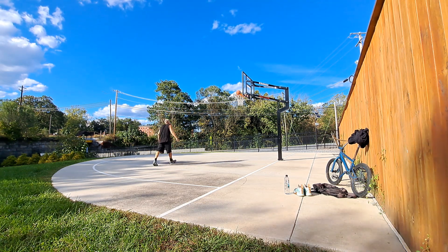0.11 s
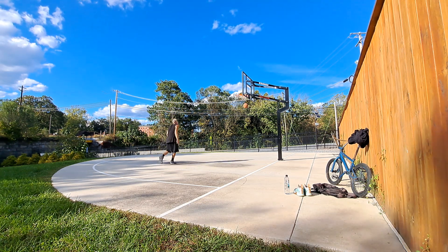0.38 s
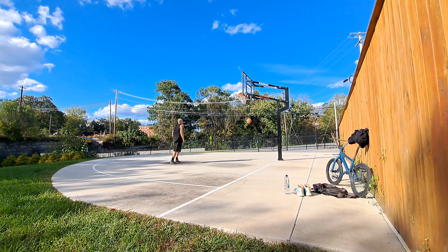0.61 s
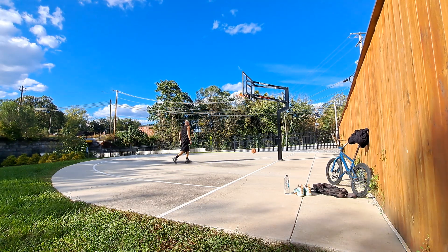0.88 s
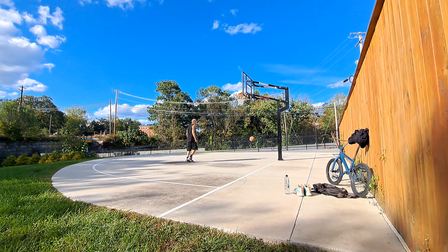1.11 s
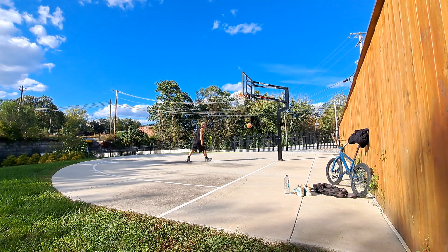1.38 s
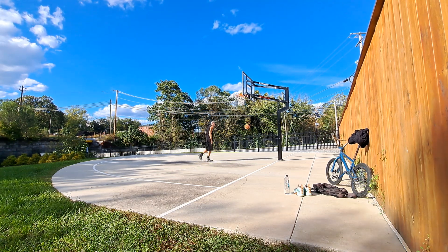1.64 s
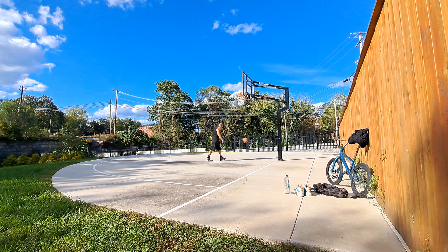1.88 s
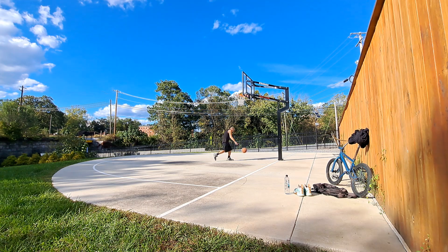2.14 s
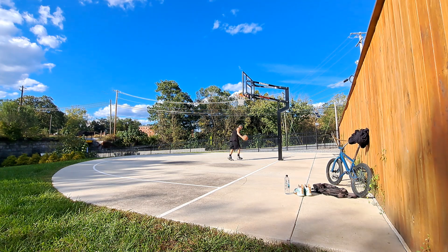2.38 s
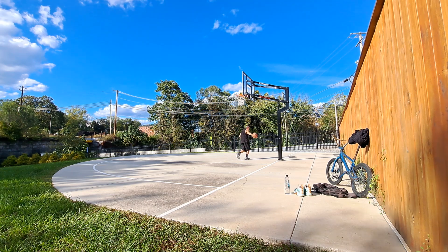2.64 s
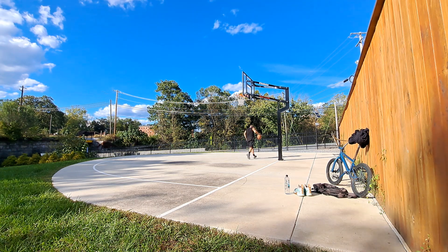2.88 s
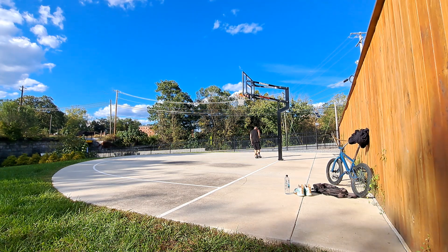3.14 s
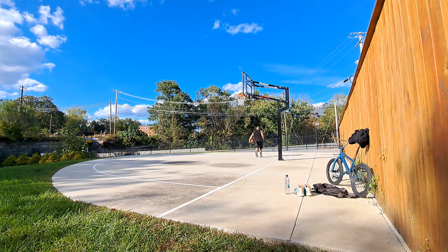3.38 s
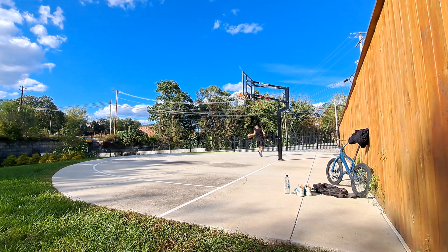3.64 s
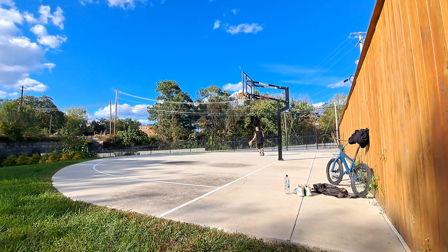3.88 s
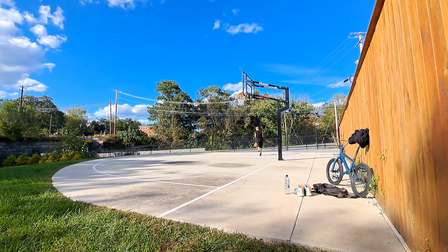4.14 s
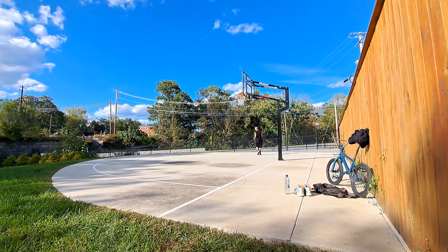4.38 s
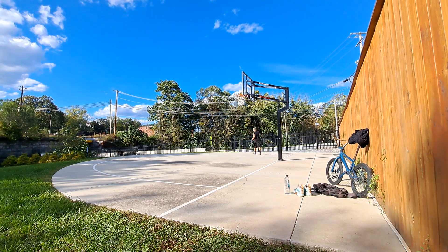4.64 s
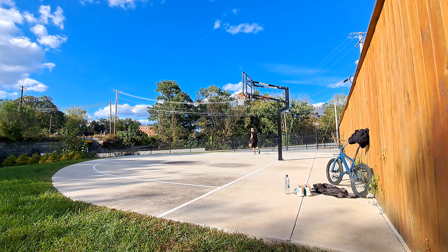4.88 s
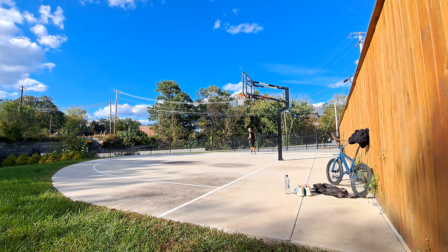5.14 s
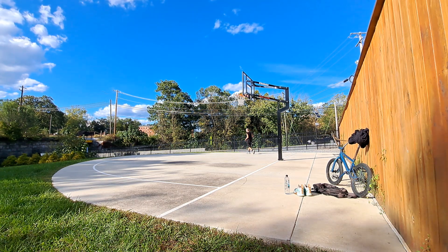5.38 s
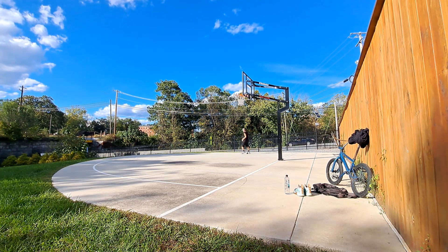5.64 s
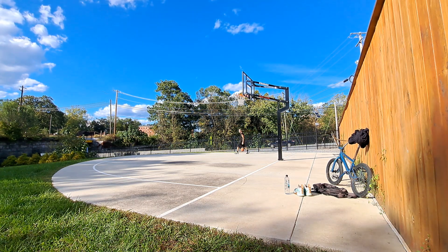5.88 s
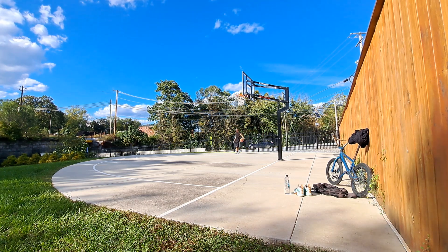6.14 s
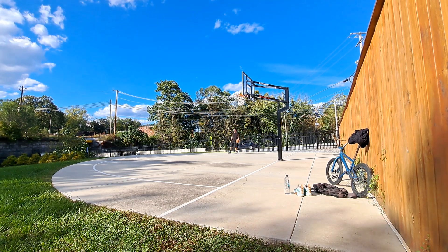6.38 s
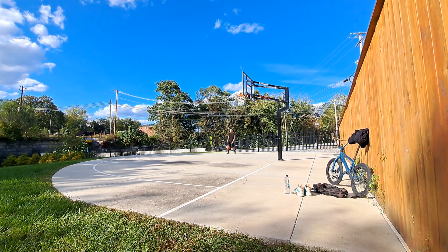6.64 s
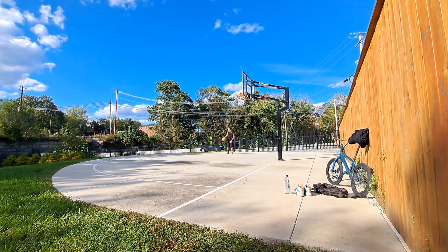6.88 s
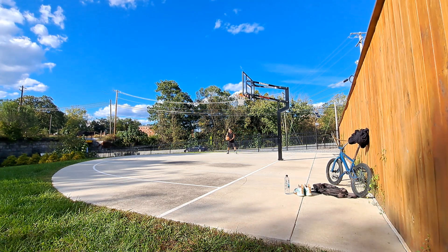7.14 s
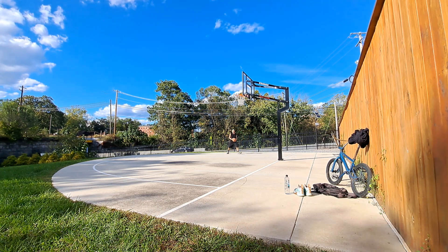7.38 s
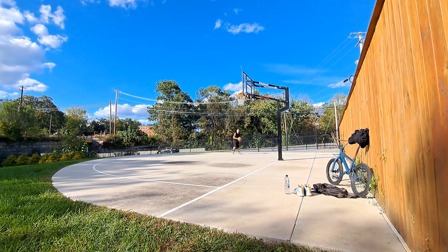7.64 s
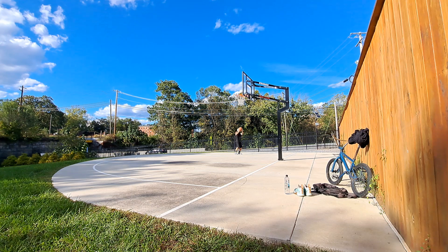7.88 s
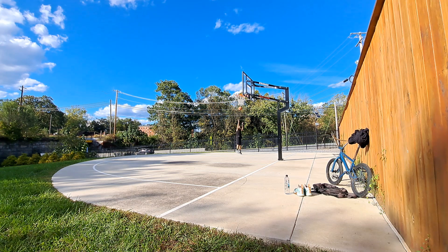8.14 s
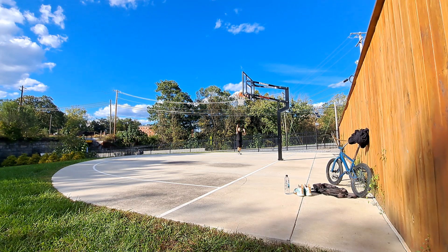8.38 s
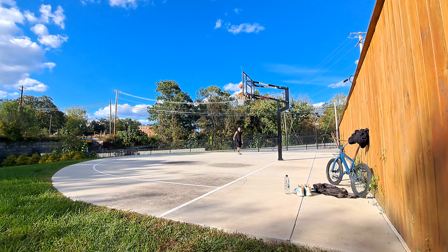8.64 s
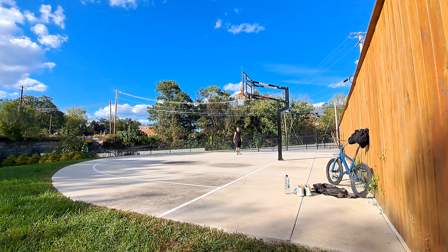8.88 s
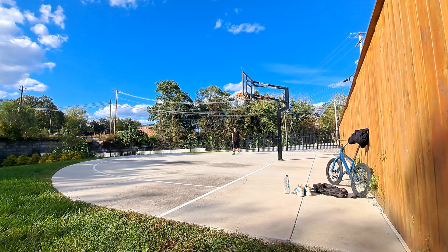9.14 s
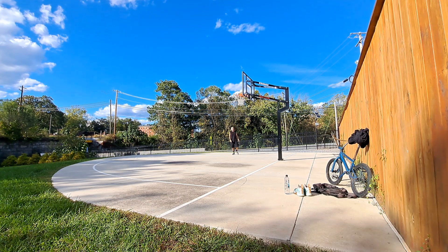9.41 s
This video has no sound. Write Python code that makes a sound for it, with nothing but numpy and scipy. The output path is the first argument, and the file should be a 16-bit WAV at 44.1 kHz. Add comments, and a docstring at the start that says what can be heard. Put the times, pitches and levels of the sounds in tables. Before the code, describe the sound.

Single sharp basketball bounces on outdoor concrete, about one a second, with hollow ring and soft echoes over crickets, low road hum and scuffing shoes.

```python
"""Outdoor court beside a wooden wall, heard by a phone: road noise, distant cars, a lorry drawing away and
crickets from the start, while a low hum slowly rises; shoes scuff and an insect buzzes as shaped noise.
Then a basketball bounces on concrete: slap, ringing air, thump, echoes; the first bounce rings the hoop post.
Later a small bird chips, thin whistles hold, soles squeak and a katydid rasps, all as gliding tones.
Cars pass nearer late on; near the end an engine revs."""
import sys
import numpy as np
from scipy import signal
from scipy.fft import rfft, irfft, next_fast_len
from scipy.io import wavfile
from scipy.ndimage import uniform_filter1d

SR = 44100
rng = np.random.default_rng(int(sys.argv[2]) if len(sys.argv) > 2 else 0)


def volts_from_db(level):
    """Convert decibel levels to linear amplitude ratios."""
    exponent = np.asarray(level, float) / 20
    return 10 ** exponent


def unload_wav(signal):
    """Save mono or channel-first audio to the path in sys.argv[1] as 16-bit WAV at rate SR, clipped to [-1, 1]."""
    wavfile.write(
        sys.argv[1],
        SR,
        np.round(np.clip(np.atleast_2d(signal).T, -1, 1) * 32767).astype(np.int16),
    )


N = 419832
T = np.arange(N) / SR

# diffuse air noise: freq_hz, relative_density_db
AIR_COLOUR = [(18, -44), (30, -10), (124, -7), (271, -16), (326, -17.5), (509, -22), (581, -23.5),
              (1490, -30), (2150, -32.5), (2870, -42.5), (3300, -42.5), (4000, -37), (4730, -39.5),
              (6200, -43.5), (7390, -42), (9350, -53.5), (12500, -53), (15800, -59)]
AIR_DB, AIR_BAND_HZ = -46.5, (32, 20000)  # low_hz, high_hz
# tyre and drone noise: freq_hz, relative_density_db
TYRE_COLOUR = [(150, -43), (250, -2.5), (335, -5.5), (850, -1), (2040, -10), (2810, -19.5), (4030, 9),
               (4300, -15), (6000, -22.5), (7800, -63), (13200, -120)]
# likeness of left and right diffuse noise: freq_hz, correlation
PORT_LIKENESS = [(60, 0.96), (130, 0.86), (290, 0.69), (640, 0.29), (1410, -0.28), (3100, 0.43),
                 (6820, -0.18), (15000, -0.066)]
# phone body shades the ports: freq_hz, left_minus_right_db
PORT_LEAN = [(60, .5), (250, -1), (500, 1), (1300, -1), (2400, -2.5), (4400, -6), (7500, -8), (9500, -1),
             (15000, -3)]
# cars: closest_s, time_to_41_percent_farther_s, drone_db, tyre_hiss_db
CARS = [(.7, 0.43, -55.5, -65.5), (5.6, 0.29, -45, -58.5), (6.9, 1, -47, -58), (8.2, 1, -44.5, -51)]
SCREEN_DB = 29.5  # fall per tenfold distance, hedges included
RUMBLE_DB, THRUM_DB, SWELL_DB = -47.5, -49.5, 3
TYRE_BOOM_DB = 1  # rumble added by near cars, relative to tyre hiss
# lorry firing tone: time_s, level_db
LORRY_LEVEL = [(0, -47.5), (.35, -43), (.55, -35), (1.0, -32), (1.5, -46.5), (1.9, -39.5), (2.4, -50.5),
               (3.2, -45), (4.4, -59)]
LORRY_HZ, LORRY_SINK_HZ_PER_S = 125.6, 5.6
# low hum that fades in and grows: time_s, peak_db
HUM_LEVEL = [(0, -92), (2.4, -50.5), (7, -45), (9.52, -40.5)]
HUM_HZ = 119

# steady cricket bouts: first_chirp_s, chirp_count, period_s
STEADY_BOUTS = [(-.037, 12, .2545), (3.24, 5, .258), (5.79, 10, .2585)]
# near cricket: start_s
NEAR_CHIRPS = [0.373, 0.855, 1.425, 2.052, 2.58, 3.04, 3.530, 4.078, 4.58, 5.101, 5.604, 6.108, 6.62, 7.091,
               7.688, 8.213, 8.703, 9.232]
# far cricket: start_s
FAR_CHIRPS = [.65, 1.48, 1.81, 2.322, 2.812, 3.31, 3.74, 4.728, 6.518, 9.39]
LEFT_LAG_SAMPLES = 4

# shoes on concrete, before SHOES_DB: start_s, hiss_db, top_hiss_db, length_s, low_scrape_db
SCUFFS = [(0.239, -52, -60, 0.024, -55), (0.307, -57, -66, 0.025, -47), (0.328, -51, -66, 0.028, -62),
          (0.346, -56, -54, 0.018, -40.5), (0.892, -57, -61, 0.037, -57), (2.11, -60, -65, 0.021, -68),
          (2.413, -58, -69, 0.018, -60), (2.646, -57, -67, 0.014, -53), (2.898, -76, -60, 0.028, -59),
          (3.023, -46.5, -41, 0.044, -55), (3.458, -47.5, -54, 0.014, -54.5), (3.844, -49, -50, 0.024, -59),
          (4.233, -60, -56.5, 0.069, -57), (4.681, -61, -49, 0.01, -66), (4.708, -73, -57, 0.086, -74),
          (5.882, -52.5, -66, 0.08, -62), (6.829, -53, -68, 0.096, -50.5), (7.812, -47, -51, 0.025, -47),
          (7.836, -36, -52, 0.056, -47), (8.397, -46.5, -97, 0.018, -81), (9.114, -59, -69, 0.07, -50.5),
          (9.184, -55, -49.5, 0.043, -46.5)]
# grit under a sole: freq_hz, relative_density_db
GRIT_COLOUR = [(1470, -45.5), (2500, 2), (2790, -8), (3910, 10.5), (4290, -14), (4820, 3.5), (5580, -6.5),
               (7890, -2.5), (9790, -27), (12800, -15), (15800, -15.5)]
SHOES_DB = -5.5
# direct and wall paths to left and right port: direct_samples, wall_samples
PORT_PATHS = [(4, 38), (0, 31)]
WALL_DB = 2
# buzzing insect: start_s
BUZZES = [.46, .92, 1.36, 1.85, 3.5, 3.96, 4.55, 8.64]
BUZZ_DB = -68

# bounces: start_s, thump_db, slap_above_thump_db, knock_above_thump_db, far_echo_ms
BOUNCES = [(1.0647, -6.5, -5, -6, 60), (2.193, -15, -0.5, -2.5, 62), (3.2890, -14.5, -12.5, 2.5, 57),
           (4.1597, -13, -10, 0, 46.4), (5.118, -13.5, -5.5, -2.5, 32), (5.987, -14.5, -4.5, -5, 60),
           (6.7068, -14, -4.5, -9, 64)]
# skin on slab, before tilt: freq_hz, relative_density_db
SLAP_COLOUR = [(410, -34), (700, -2), (1590, 0.5), (3670, -7), (5150, -6), (6100, -14.5), (7130, -8.5),
               (8340, -18), (9380, -29), (12300, -22.5), (15800, -36)]
BRIGHTER_DB_PER_OCTAVE_PER_DB, USUAL_THUMP_DB = 0.42, -16
# air in the ball, before RING_DB: freq_hz, level_db, t60_s
CAVITY_MODES = [(400, -10.5, 0.077), (614, -3.5, 0.042), (720, 1, 0.017), (805, 3, 0.025),
                (919, 4.5, 0.024), (1080, 1.5, 0.023), (1266, -15, 0.074), (1780, 3, 0.017),
                (2570, 0, 0.014)]
# shell squashed on the slab: freq_hz, level_db, t60_s
THUMP_MODES = [(138, 0.007, 0.046)]
# shell knock, relative to each bounce: freq_hz, level_db, t60_s
KNOCK_MODES = [(199, -7, 0.046), (262.5, 1.5, 0.0247)]
CONTACT_S, LIFT_DB = 0.012, -11.5
THUMP_LAG_S, KNOCK_LAG_S, RING_RISE_S = 0.0026, 0.003, 0.002
RING_DB, ECHO_DB = -9, -33  # relative to thump; scale the modes and echo envelope
# far echoes: freq_hz, relative_density_db
FAR_COLOUR = [(150, -5), (300, 4), (1000, -3.5), (2200, -8.5), (3200, -16.5), (5500, -20.5), (8000, -29),
              (10000, -37), (15500, -39)]
# hoop post: freq_hz, level_db, t60_s
HOOP_MODE = (2870, -41, .6)

# bird chips: start_s, length_s, from_hz, to_hz, level_db
CHIPS = [(4.365, 0.033, 8690, 8700, -65), (4.693, 0.089, 8700, 8340, -67), (4.74, 0.032, 8700, 7500, -61),
         (4.815, 0.036, 6950, 8000, -65), (4.842, 0.05, 8150, 8200, -62), (4.876, 0.053, 8100, 7500, -66),
         (4.974, 0.038, 7000, 6030, -61), (6.339, 0.05, 8560, 7600, -62), (6.425, 0.045, 6250, 7200, -62),
         (9.263, 0.061, 5940, 7000, -62)]
# held whistles, perhaps brakes: start_s, length_s, pitch_hz, level_db
WHISTLES = [(5.78, .4, 7380, -68), (6.15, .75, 7350, -72), (6.0, .5, 9020, -80), (7.33, .15, 7260, -69)]
SAG_HZ_PER_S = 72
# sole squeaks: start_s, pitch_hz, level_db
SQUEAKS = [(6.875, 4730, -59), (7.817, 4930, -52), (7.87, 4900, -45)]
SQUEAK_S, SQUEAK_END_RATIO = 0.022, 0.92
RASP_S, RASP_PERIOD_S, RASP_TOP_S = 7.012, 0.271, 7.65
RASP_REFERENCE_DB, RASP_FADE_DB_PER_S = -54.5, 6
REV_S, REV_HZ, REV_RISE_HZ_PER_S, REV_DB = 9.1, 121.7, 35.7, -36.5
REV_ATTACK_S, REV_HOLD_S, REV_RELEASE_S = 0.16, 0.14, 0.075


def gain_at(hz, table):
    """Interpolate a frequency table on a log-frequency axis."""
    freq_hz, value = np.transpose(table)
    return np.interp(np.log(np.maximum(hz, 1)), np.log(np.maximum(freq_hz, 1)), value)


def colour(x, table):
    """Minimum-phase filter from the folded cepstrum of a dB table."""
    cepstrum = irfft(np.log(volts_from_db(gain_at(np.arange(1025) * SR / 2048, table))))
    cepstrum[1:1024] *= 2
    cepstrum[1025:] = 0
    response = irfft(np.exp(rfft(cepstrum)))
    return signal.oaconvolve(x, response)[:len(x)]


def unit(x):
    """Scale to rms 1."""
    return x / np.sqrt(np.mean(x ** 2))


def filtered(x, order, hz, kind):
    """Butterworth filter."""
    return signal.sosfilt(signal.butter(order, hz, kind, fs=SR, output="sos"), x)


def walk(rate_hz):
    """Random levels held 1 / rate_hz seconds, then smoothed twice."""
    hold = int(SR / rate_hz)
    steps = np.repeat(rng.standard_normal(N // hold + 1), hold)
    return uniform_filter1d(uniform_filter1d(steps, hold), hold)[:N]


def add(out, start_s, x):
    """Mix x into out at start_s, trimming both ends."""
    i = int(round(start_s * SR))
    x = x[..., max(-i, 0):N - i]
    out[..., max(i, 0):max(i, 0) + x.shape[-1]] += x


def place(x, pan_db, lag_samples):
    """Point source: level difference between ports, left port delayed."""
    return np.array([np.roll(x, lag_samples), x]) * volts_from_db(np.array([[pan_db], [-pan_db]]) / 2)


def by_wall(x):
    """Each port hears a direct and a wall path; the phone body shades the treble."""
    dull = filtered(x, 1, 7000, "lowpass")  # rough boards scatter the treble
    left, right = [np.roll(x, direct) + volts_from_db(WALL_DB) * np.roll(dull, wall) for direct, wall in PORT_PATHS]
    return np.array([colour(port, [(hz, side * db / 2) for hz, db in PORT_LEAN])
                     for port, side in ((left, 1), (right, -1))])


def blur(x, tail_db):
    """Trees and fences add a short scattered tail."""
    t = T[:SR // 10]
    tail = volts_from_db(tail_db) * rng.standard_normal(len(t)) * 1000. ** (-t / 0.17)
    tail[0] = 1
    return signal.oaconvolve(x, tail)[:N]


def ring(modes, t, spread_db):
    """Decaying modes struck at t = 0, with random level spread."""
    t = np.maximum(t, 0)
    out = 0
    for hz, db, t60_s in modes:
        level = volts_from_db(db + spread_db * rng.standard_normal())
        out = out + level * np.sin(2 * np.pi * hz * t) * 1000. ** (-t / t60_s)
    return out


def note(length_s, from_hz, to_hz, waver_db, waver_samples=250):
    """Gliding near-sine with soft ends and random level waver."""
    n = int(length_s * SR)
    knots = n // waver_samples + 2
    waver = np.interp(np.arange(n), np.linspace(0, n, knots), rng.standard_normal(knots))
    phase = 2 * np.pi * np.cumsum(np.linspace(from_hz, to_hz, n)) / SR
    return signal.windows.tukey(n, 0.5) * volts_from_db(waver_db * waver) * np.sin(phase)


def thin_notes(rows):
    """Thin notes, smeared by the trees."""
    out = np.zeros(N)
    for start_s, length_s, from_hz, to_hz, db in rows:
        add(out, start_s, volts_from_db(db) * note(length_s, from_hz, to_hz, waver_db=3.5, waver_samples=400))
    return place(blur(out, -33), -7, 0)


def tone(hz):
    """Unit-rms sine following a frequency curve."""
    return np.sqrt(2) * np.sin(2 * np.pi * np.cumsum(hz) / SR)


def bands(table, low_hz, high_hz, flicker_db):
    """Diffuse noise, partly shared by the ports, in independently flickering octaves."""
    size = next_fast_len(N)
    hz = np.arange(size // 2 + 1) * SR / size
    alike = np.clip(gain_at(hz, PORT_LIKENESS), -0.9, 0.99)
    white = rfft(rng.standard_normal((2, size)))
    mid, side = white * np.sqrt([1 + alike, 1 - alike]) * volts_from_db(gain_at(hz, table))
    lean = volts_from_db(gain_at(hz, PORT_LEAN) / 2)
    pair = np.array([(mid + side) * lean, (mid - side) / lean])
    out = 0
    for centre in np.arange(np.log2(low_hz), np.log2(high_hz), 1):
        window = np.cos(np.pi / 2 * np.clip(np.log2(hz + 1) - centre, -1, 1)) ** 2
        out = out + volts_from_db(flicker_db * walk(6)) * irfft(pair * window)[:, :N]
    return unit(out)


def air():
    """Steady diffuse broadband noise."""
    return volts_from_db(AIR_DB) * bands(AIR_COLOUR, *AIR_BAND_HZ, flicker_db=0.1)


def car_gains():
    """Drone and tyre gains: car powers add, each falling with distance."""
    closest_s, span_s, drone_db, tyre_db = np.transpose(CARS)[:, :, None]
    fall_db = -SCREEN_DB * np.log10(np.hypot(1, (T - closest_s) / span_s))
    return [np.sqrt(np.sum(volts_from_db(db + fall_db) ** 2, axis=0)) for db in (drone_db, tyre_db)]


def cars():
    """Passing drone and tyre hiss; near tyres also lift the swelling low rumble."""
    drone, tyre = car_gains()
    out = drone * bands(TYRE_COLOUR, 250, 1100, flicker_db=1.2)
    out += tyre * bands(TYRE_COLOUR, 1900, 2100, flicker_db=1)
    rumble = bands([(38, -38), (54, 0.5), (66, -18), (95, -37.5)], 32, 130, flicker_db=3)
    return out + (volts_from_db(RUMBLE_DB + SWELL_DB * walk(1)) + volts_from_db(TYRE_BOOM_DB) * tyre) * rumble


def thrum():
    """Slowly swelling low road noise."""
    noise = bands([(80, -15), (120, 4.5), (190, -2.5), (300, -18), (450, -28.5)], 55.4, 500, flicker_db=1.5)
    return volts_from_db(THRUM_DB + SWELL_DB * walk(0.79)) * noise


def lorry():
    """Firing tone that sinks as the lorry draws away."""
    level_db = np.interp(T, *np.transpose(LORRY_LEVEL), right=-90) + 0.5 * walk(7.2)
    return volts_from_db(level_db) * tone(LORRY_HZ - LORRY_SINK_HZ_PER_S * T)


def hum():
    """Low sine of rising level, wavering in level and phase."""
    level_db = np.interp(T, *np.transpose(HUM_LEVEL)) + 2.2 * walk(4.52)
    return volts_from_db(level_db) * np.sin(2 * np.pi * HUM_HZ * T + 0.73 * walk(2.72))


def cricket(starts_s, strokes, hz, db, pan_db):
    """Chirps of falling wing-stroke tones; strokes: offset_s, length_s, relative_db."""
    out = np.zeros(N)
    for start_s in starts_s:
        for offset_s, length_s, stroke_db in strokes:
            level = volts_from_db(db + stroke_db + 1.2 * rng.standard_normal())
            add(out, start_s + offset_s, level * note(length_s, hz * 1.008, hz * 0.994, waver_db=1))
    return place(out, pan_db, LEFT_LAG_SAMPLES)


def crickets():
    """Three crickets with different pitches and stroke patterns."""
    steady_s = [start_s + period_s * k for start_s, count, period_s in STEADY_BOUTS for k in range(count)]
    out = cricket(steady_s, [(0, 0.018, -2.5), (0.048, 0.02, -0.86)], 4620, -55.5, -5.5)
    near_strokes = [(-0.055, 0.02, -8), (-0.004, 0.029, 0), (0.063, 0.03, 0)]
    out += cricket(NEAR_CHIRPS, near_strokes, 4005, -55.5, -15)
    far_strokes = [(0, 0.018, 0), (0.037, 0.018, 0), (0.074, 0.018, 0), (0.111, 0.018, 0)]
    return out + cricket(FAR_CHIRPS, far_strokes, 5750, -59.5, -6)


def shoes():
    """Grit dragged under a sole: uneven dense grains over a duller scrape."""
    grains = rng.standard_normal(N) * volts_from_db(3.8 * walk(400) + 0.66 * walk(70))
    grit = colour(grains, GRIT_COLOUR)
    hiss = unit(filtered(grit, 4, 9700, "lowpass"))
    top = unit(filtered(grit, 4, 9700, "highpass"))
    scrape = unit(filtered(grains, 2, [600, 2200], "bandpass"))
    out, t = np.zeros(N), T[:SR // 4]
    for start_s, hiss_db, top_db, length_s, low_db in SCUFFS:
        shape = np.clip(t / 0.0048, 0, 1) * 1000. ** (-np.clip(t - length_s, 0, 1) / 0.051)
        part = slice(int(start_s * SR), int(start_s * SR) + len(t))
        out[part] += shape * (volts_from_db(hiss_db) * hiss[part] + volts_from_db(top_db) * top[part] + volts_from_db(low_db) * scrape[part])
    return volts_from_db(SHOES_DB) * by_wall(out)


def buzzing_insect():
    """Narrow noise near 7.5 kHz in short half-sine swells."""
    buzz = unit(filtered(rng.standard_normal(N), 2, [7350, 7650], "bandpass"))
    out = np.zeros(N)
    for start_s in BUZZES:
        out += volts_from_db(BUZZ_DB) * buzz * np.sin(np.pi * np.clip((T - start_s) / 0.12, 0, 1))
    return place(blur(out, -36), -6, LEFT_LAG_SAMPLES)


def ball_slap(t, thump_db, slap_db):
    """Click and decaying noise of skin on slab; harder bounces are brighter."""
    decay = volts_from_db(-20) * 1000. ** (-t / 0.014) + volts_from_db(-33) * 1000. ** (-t / 0.067)
    crack = rng.standard_normal(len(t)) * decay
    crack[0] = -1
    tilt_db = BRIGHTER_DB_PER_OCTAVE_PER_DB * (thump_db - USUAL_THUMP_DB)
    slap = colour(crack, [(hz, db + tilt_db * np.log2(hz / 2000)) for hz, db in SLAP_COLOUR])
    return volts_from_db(slap_db) * slap / np.abs(slap).max()


def ball_shell(t, knock_db):
    """Squashed shell thumps and knocks, then knocks again as it leaves the ground."""
    thump = ring(THUMP_MODES, t - THUMP_LAG_S, spread_db=0) * np.minimum(t / 0.0116, 1)
    knock = ring(KNOCK_MODES, t - KNOCK_LAG_S, spread_db=2.5) * np.minimum(t / 0.006, 1)
    leave = volts_from_db(LIFT_DB) * ring(KNOCK_MODES, t - CONTACT_S, spread_db=0.5)
    push = np.hanning(int(0.0021 * SR))
    return np.convolve(thump + volts_from_db(knock_db) * (knock + leave), push / push.sum())[:len(t)]


def echo_envelope(t, far_ms):
    """Scattered ground and fence returns, one far wall, then trees."""
    late_s = t - far_ms / 1000
    scatter = 6.1 * 1000. ** (-t / 0.12) * (t > 0.008)
    wall = 0.7 * 1000. ** (-np.abs(late_s) / 0.05)
    trees = 1000. ** (-late_s / 0.5)
    return scatter + np.clip(late_s / 0.003, 0, 1) * (trees + wall)


def ball():
    """Slap, ringing air and thump; the shell snaps back on leaving, then far echoes."""
    near, far, t = np.zeros(N), np.zeros((2, N)), T[:SR // 2]
    for start_s, thump_db, slap_db, knock_db, far_ms in BOUNCES:
        slap = ball_slap(t, thump_db, slap_db)
        cavity = volts_from_db(RING_DB) * ring(CAVITY_MODES, t, spread_db=3.5) * np.minimum(t / RING_RISE_S, 1)
        lift = volts_from_db(LIFT_DB) * np.roll(cavity + volts_from_db(-19) * slap, int(CONTACT_S * SR))
        add(near, start_s, volts_from_db(thump_db) * (slap + cavity + lift + ball_shell(t, knock_db)))
        add(far, start_s, volts_from_db(thump_db + ECHO_DB) * echo_envelope(t, far_ms))
    echo_noise = np.array([unit(colour(white, FAR_COLOUR)) for white in rng.standard_normal((2, N))])
    return by_wall(near) + far * echo_noise


def hoop():
    """The hoop post answers the hardest bounce with one slow-rising mode."""
    out, t = np.zeros(N), T[:SR // 2]
    add(out, BOUNCES[0][0], ring([HOOP_MODE], t, spread_db=0) * np.minimum(t / 0.15, 1) ** 2)
    return by_wall(out)


def bird():
    """Short gliding chips of a small bird."""
    return thin_notes(CHIPS)


def held_whistles():
    """Thin held tones that sag slightly."""
    return thin_notes([(start_s, length_s, hz, hz - SAG_HZ_PER_S * length_s, db)
                       for start_s, length_s, hz, db in WHISTLES])


def sole_squeaks():
    """Brief falling squeaks of soles."""
    return thin_notes([(start_s, SQUEAK_S, hz, hz * SQUEAK_END_RATIO, db) for start_s, hz, db in SQUEAKS])


def katydid():
    """Rasps of six tooth strikes that tend to grow, each three falling tones."""
    out = np.zeros(N)
    for rasp_s in RASP_S + RASP_PERIOD_S * np.arange(5):
        rasp_db = RASP_REFERENCE_DB - RASP_FADE_DB_PER_S * abs(rasp_s - RASP_TOP_S)
        for k in range(6):
            strike_s = rasp_s + 0.0235 * k
            strike = volts_from_db(rasp_db - 2.1 * (6.5 - k) + 2.2 * rng.standard_normal())
            add(out, strike_s, strike * volts_from_db(-3) * note(0.009, 14200, 12600, waver_db=4, waver_samples=20))
            add(out, strike_s + 0.011, strike * volts_from_db(-5) * note(0.006, 12300, 10800, waver_db=5, waver_samples=14))
            add(out, strike_s - 0.004, strike * volts_from_db(10) * note(0.011, 4000, 3300, waver_db=2, waver_samples=60))
    return place(blur(out, -36), -6, LEFT_LAG_SAMPLES)


def revving_engine():
    """Brief engine tone of rising pitch."""
    corners_s = np.cumsum([0, REV_ATTACK_S, REV_HOLD_S, REV_RELEASE_S])
    envelope = np.interp(T - REV_S, corners_s, [0, 1, 1, 0])
    return volts_from_db(REV_DB) * envelope * tone(REV_HZ + REV_RISE_HZ_PER_S * np.maximum(T - REV_S, 0))


def scene():
    """Sum of all sources at the two ports."""
    out = air() + cars() + thrum() + lorry() + hum()
    out += crickets() + shoes() + buzzing_insect()
    out += ball() + hoop()
    out += bird() + held_whistles() + sole_squeaks() + katydid()
    return out + revving_engine()


def band_limit(x):
    """A steep low-pass at the top of the band."""
    return signal.sosfilt(signal.butter(12, 16520, fs=SR, output="sos"), x)


def record(dry):
    """The phone drops the deepest bass."""
    mix = filtered(dry, 3, 42, "highpass")
    return band_limit(mix)


dry = scene()
out = record(dry)
unload_wav(out)
```